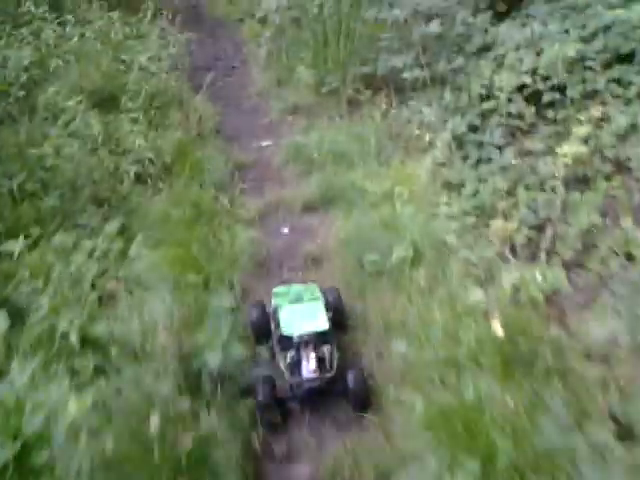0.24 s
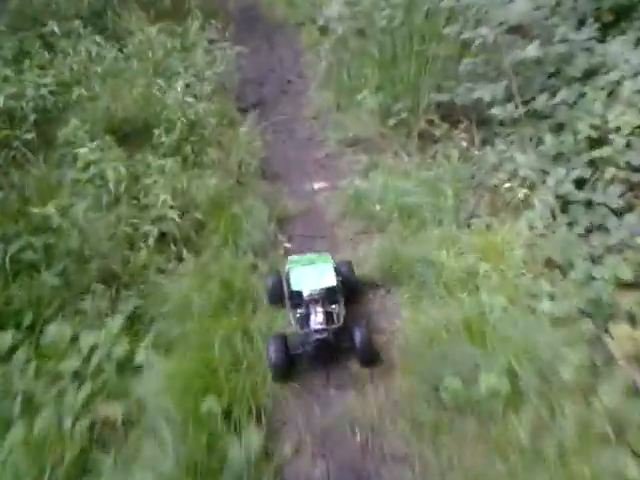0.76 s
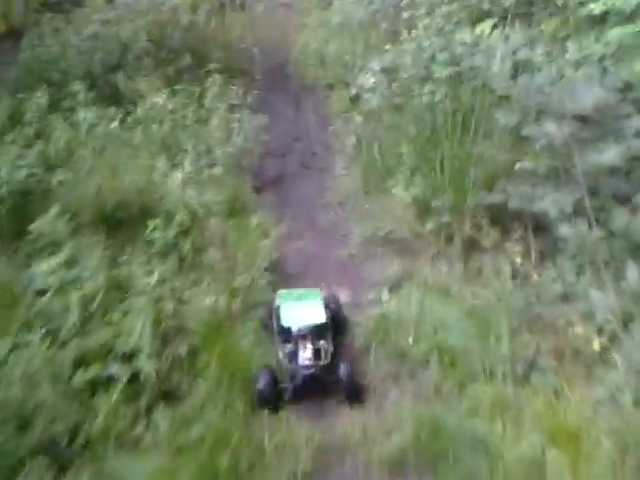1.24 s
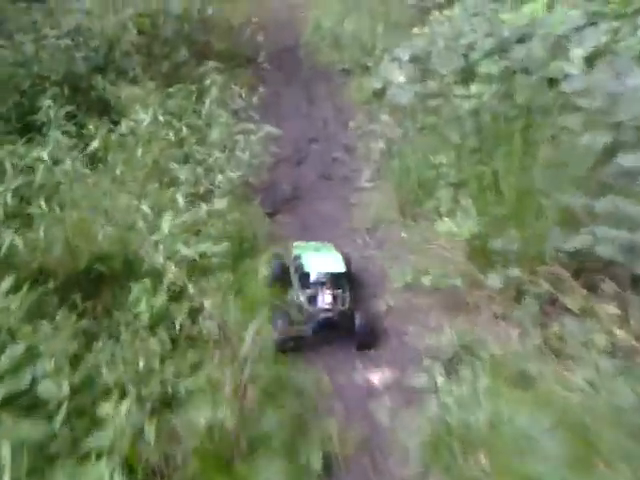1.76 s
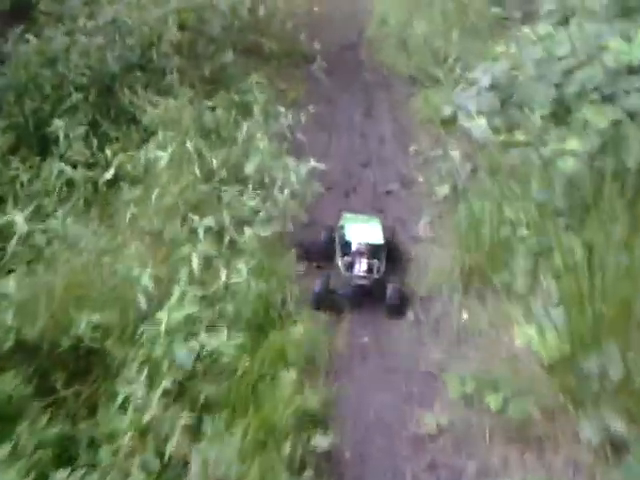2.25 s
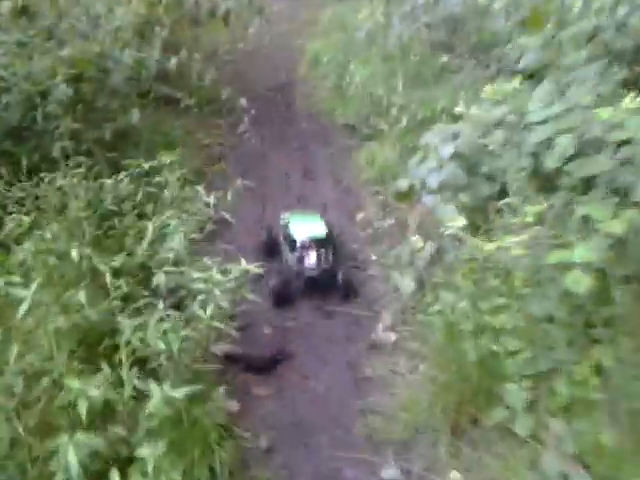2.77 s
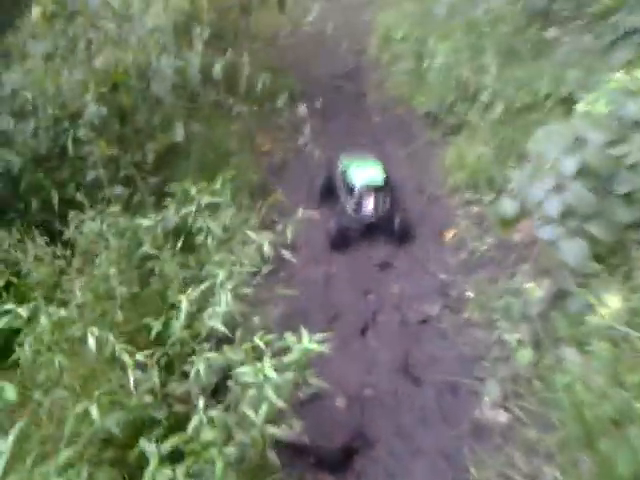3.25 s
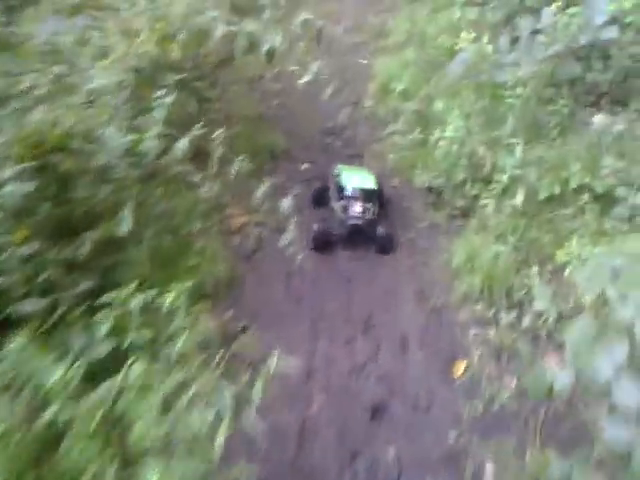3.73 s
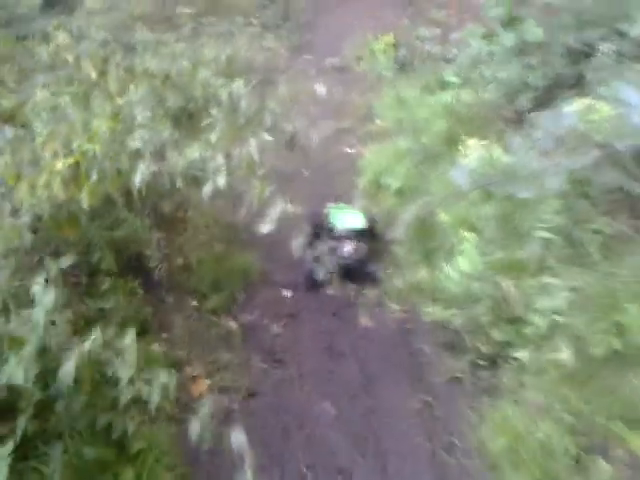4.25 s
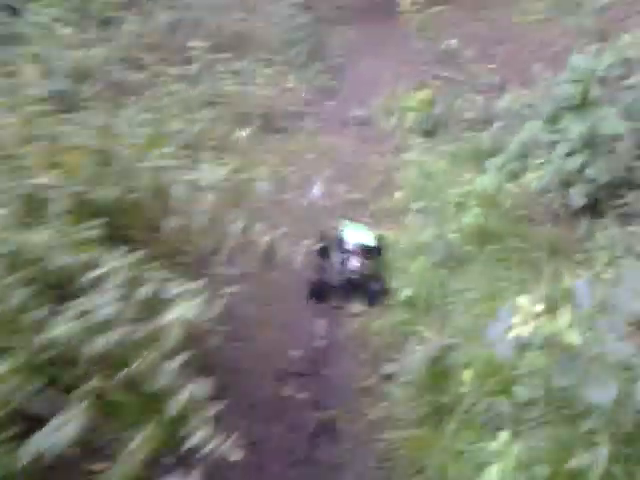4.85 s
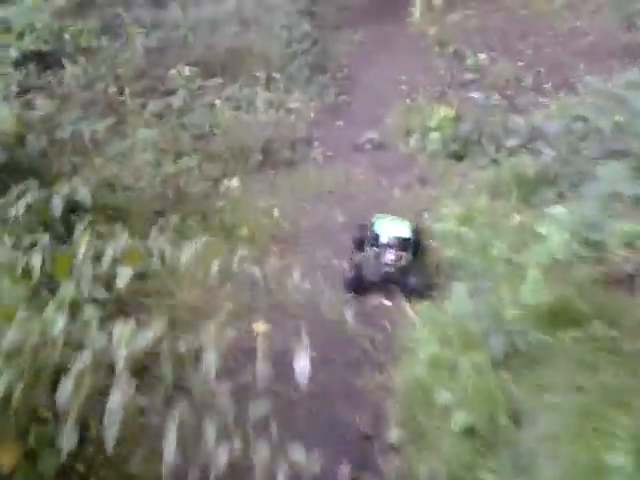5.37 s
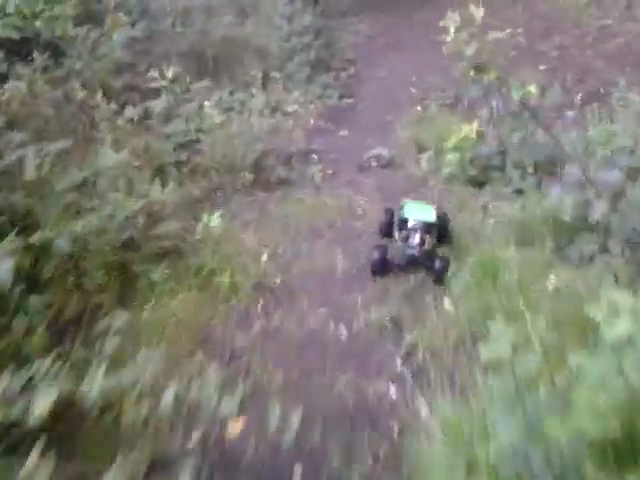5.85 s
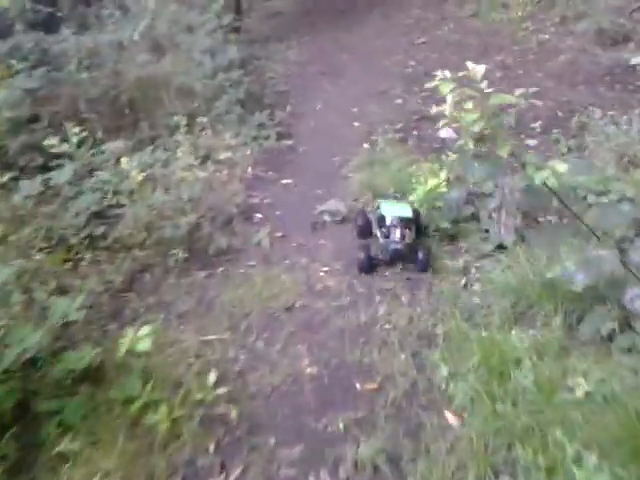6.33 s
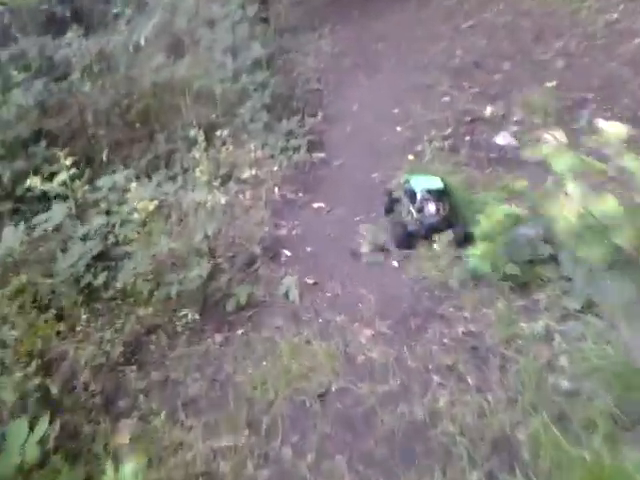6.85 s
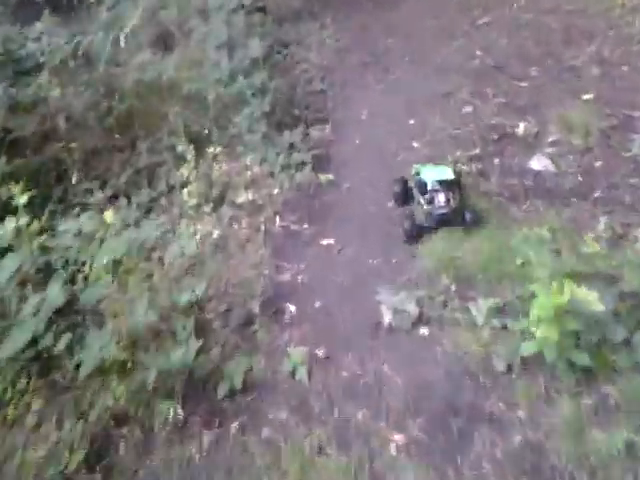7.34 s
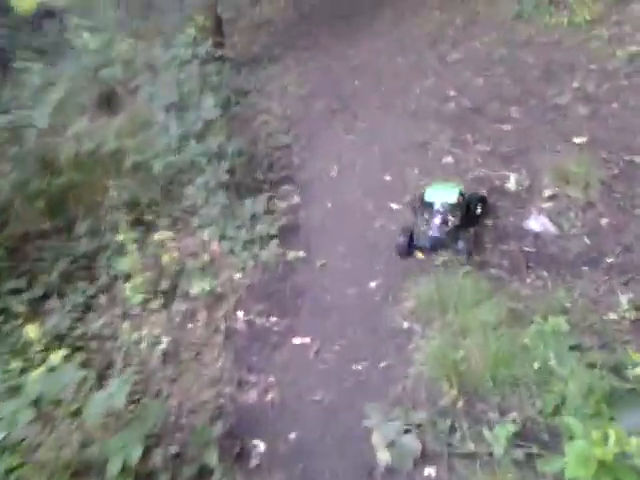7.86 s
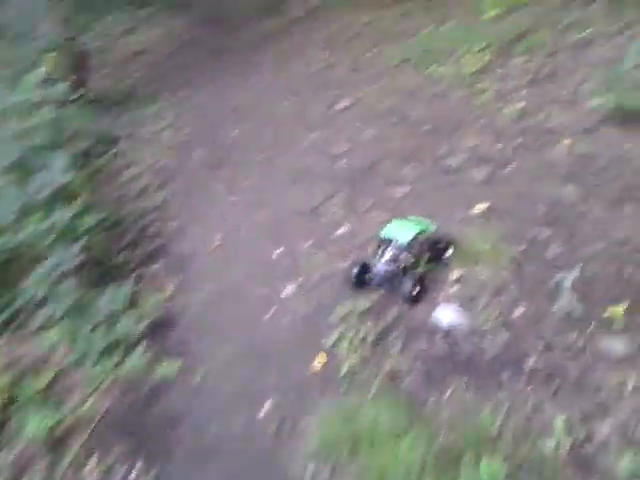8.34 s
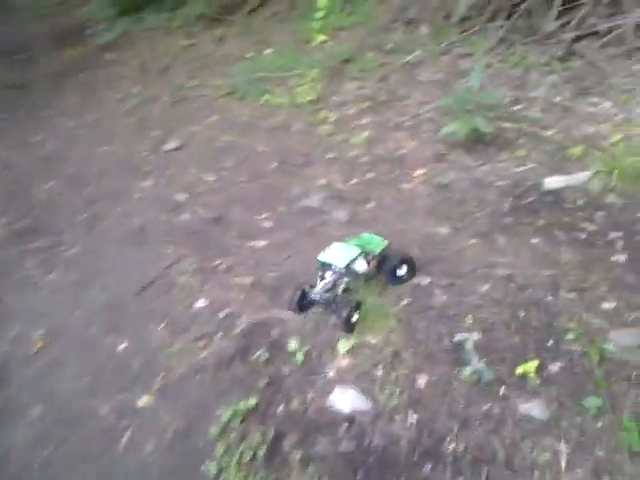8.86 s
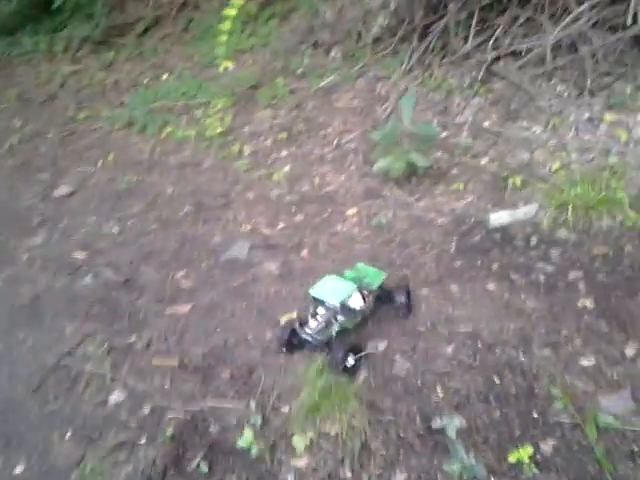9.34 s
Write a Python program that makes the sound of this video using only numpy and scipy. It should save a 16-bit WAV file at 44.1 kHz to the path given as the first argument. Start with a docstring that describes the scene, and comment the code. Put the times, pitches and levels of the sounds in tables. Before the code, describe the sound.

Irregular hollow clacks, thumps and scuffs on a carried camera, over a warbling little gear whine, fizzing motor and rustling grass outdoors.

```python
"""An overgrown woodland trail: a walker follows a small electric crawler truck, camera in hand.
The steps swing something loose against the camera: damped tones make its case ring and thump, noise its scrapes.
Ahead, the truck's gears warble once per turn as their tone sweeps through resonances, clatter, chirp and squeal.
Its motor fizzes, the steering servo buzzes in ticks, and grass rustles under the tyres.
Shaped noise also makes the distant wash of the woods, short treble swishes and the rub of the hand."""
import sys
import numpy as np
from scipy import signal
from scipy.fft import rfft, irfft, next_fast_len
from scipy.io import wavfile
from scipy.ndimage import map_coordinates

SR = 44100
rng = np.random.default_rng(int(sys.argv[2]) if len(sys.argv) > 2 else 0)


def generate_wav(sig):
    """Save sig (samples, or channels by samples) to the path in sys.argv[1] as 16-bit PCM at SR."""
    pcm = np.round(np.clip(np.atleast_2d(sig).T, -1, 1) * 32767).astype(np.int16)
    wavfile.write(sys.argv[1], SR, pcm)


N = 423360  # length of the scene in samples


def amp(db):
    """Turn decibels into a gain."""
    return 10 ** (np.asarray(db) / 20)


def unit(x):
    """Scale a sound to an rms level of 1."""
    return x / np.sqrt(np.mean(x ** 2) + 1e-20)


def along(points, hz):
    """Read a curve of (f/Hz, value) points at the given frequencies, on a log axis."""
    f, v = np.transpose(points)
    return np.interp(np.log(hz + 1), np.log(f + 1), v)


def curves(rows):
    """Join the rows of a timed table by straight lines, one curve per column after the time."""
    s, *cols = np.transpose(rows)
    return [np.interp(np.arange(N) / SR, s, c) for c in cols]


def wobble(rate):
    """Draw a smooth random curve through so many random points a second."""
    points = rng.standard_normal(int(N * rate / SR) + 4)
    return map_coordinates(points, [np.arange(N) * rate / SR])


def swell(s, length):
    """Make a bell-shaped gain around time s, down to 1/e half a length away on either side."""
    away = 2 * (np.arange(N) / SR - s) / length
    return np.exp(-np.minimum(away ** 2, 50))


def filtered(x, response):
    """Multiply the spectrum of x by a gain that depends on frequency."""
    m = next_fast_len(N + SR // 2)
    return irfft(rfft(x, m) * response(np.fft.rfftfreq(m, 1 / SR)), m)[:N]


def coloured(x, spectrum):
    """Shape x with a spectrum table, at rms 1."""
    return unit(filtered(x, lambda hz: amp(along(spectrum, hz))))


def noise(spectrum):
    """Make noise of rms 1 shaped by a spectrum table."""
    return coloured(rng.standard_normal(N), spectrum)


def add(track, s, sound):
    """Mix a sound into the track at time s."""
    start = max(round(s * SR), 0)
    track[start:start + len(sound)] += sound[:max(len(track) - start, 0)]


RELEASE_S = 0.004  # how quickly a blow lets go of the case


def ring(modes, t, detune, flat=0):
    """Sum damped tones; each contact varies their level, pitch and decay, and holds them flat until it lets go."""
    hz, db, t60 = np.transpose(modes)[:, :, None]
    strength, shift = rng.standard_normal((2, len(modes), 1))
    damping = np.exp(.18 * rng.standard_normal())
    lag_s = flat * RELEASE_S * (1 - np.exp(-t / RELEASE_S))
    level = amp(db + strength - 60 * damping * t / t60)
    tones = np.sin(2 * np.pi * hz * (1 + detune * shift) * (t - lag_s))
    return np.sum(level * tones, axis=0)


# speed of the motor, as the mean rate at which gear teeth meet: (t/s, f/Hz)
MOTOR_SPEED = [(0, 2020), (.3, 2349), (.65, 2280), (.9, 2078), (1.45, 2253), (1.7, 1995), (2.0, 2068),
               (2.2, 2334), (2.55, 2380), (2.7, 1989), (3.3, 1992), (3.8, 1938), (4.3, 2022), (5.1, 1967),
               (5.3, 1792), (5.5, 2020), (5.8, 1871), (6.2, 2095), (6.75, 2085), (7.0, 1310), (7.25, 1240),
               (7.55, 1584), (7.9, 1592), (8.4, 1444), (8.7, 1497), (9.1, 1126), (9.6, 1066)]
TEETH = 98  # teeth that meet in one turn of the spur gear
CRUISE_HZ = 2100  # rate of meeting teeth at walking pace
BINDING_SHARE = .75  # share of each turn in which the gear slows
LOAD_DB = 7  # swing of the pressure on the teeth, up and down, within a turn
SWING_HZ = 340  # roughly how far the tone sinks in each turn


def drive():
    """The spur gear binds, slows and springs free once per turn: mean and momentary mesh Hz, and load on the teeth."""
    mesh_hz, = curves(MOTOR_SPEED)
    turn = (np.cumsum(mesh_hz / TEETH) / SR + .08 + .03 * wobble(12)) % 1
    slowing = np.maximum(1 - turn / BINDING_SHARE, 0) ** 1.7
    springing_free = np.maximum(turn - BINDING_SHARE, 0) / (1 - BINDING_SHARE)
    swing = slowing + springing_free
    sag_hz = SWING_HZ * amp(2.2 * wobble(17)) * (swing - swing.mean())
    # the faster the truck, the more the ground jolts the motor
    ground_jolts = (.013 * wobble(20) + .014 * wobble(85)) * (mesh_hz / CRUISE_HZ) ** 2
    jolts = ground_jolts + .008 * wobble(500)
    # the teeth press hardest as the gear slows
    load = amp(LOAD_DB * np.cos(2 * np.pi * (turn - .21)) + 3 * wobble(35))
    return mesh_hz, mesh_hz * (1 + jolts) + sag_hz, load


# the gears under load: (t/s, relative whine level/dB, relative level of the octave overtone/dB)
GEAR_WHINE = [(0, -43, -7), (.25, -38.5, -6), (2.6, -39, -6), (3.7, -41, -1), (4.9, -38.5, -7),
              (5.8, -38.5, -9), (6.5, -43, -14), (7.25, -39, -3), (7.7, -44, -7), (9.1, -38, -15),
              (9.6, -46, -12)]
# resonances of the gearbox: (f/Hz, width/Hz, level/dB)
GEARBOX_RESONANCES = [(1270, 300, -7), (1975, 190, 0), (2410, 190, -1.5), (2760, 110, -10), (2990, 190, -5),
                      (3400, 170, -13), (3950, 120, -10), (4340, 220, -6.5), (4720, 240, -3),
                      (5150, 400, -10), (5630, 150, -6)]
CLATTER_DB = -4  # loose teeth rattling the gearbox, under the whine at walking pace


def gears(mesh_hz, hz, load):
    """The mesh tone and its octave sweep through the gearbox resonances once per turn, over a noisy clatter."""
    whine_db, overtone_db = curves(GEAR_WHINE)
    phase = 2 * np.pi * np.cumsum(hz) / SR

    def box(f):
        """Each resonance lifts the frequencies near its centre, over a faint even floor."""
        peaks = (amp(db) / (1 + (2 * (f - centre) / width) ** 2) for centre, width, db in GEARBOX_RESONANCES)
        return amp(-32) + sum(peaks)

    # the octave sounds only on the very peaks of the upper resonances
    octave_peaks = 2 * box(2 * hz) ** 2 / (1 + (2700 / (2 * hz)) ** 40)
    octave_tone = np.sin(2 * phase + .6 * wobble(600))
    overtone = amp(overtone_db + 4 * wobble(40)) * octave_peaks * octave_tone
    tones = unit(load * (box(hz) * np.sin(phase) + overtone))
    # the clatter is brighter than the tones and grows quickly with speed
    rattle = np.sqrt(load) * rng.standard_normal(N)
    clatter = unit(filtered(rattle, lambda f: f * box(f)))
    octaves_above_cruise = np.log2(mesh_hz / CRUISE_HZ)
    clatter_gain = amp(CLATTER_DB + 15 * octaves_above_cruise)
    return amp(whine_db - 1.7) * (tones + clatter_gain * clatter)


# presses of the throttle: (start t/s, end t/s, relative level of the brush fizz/dB)
THROTTLE_PRESSES = [(-0.1, 0.822, -46), (1.1, 1.58, -39.5), (1.7, 2.098, -59), (2.196, 2.66, -43),
                    (2.911, 3.382, -42.5), (3.686, 4.404, -50), (4.466, 5.252, -39.5), (5.51, 5.905, -38.5),
                    (5.996, 6.206, -34), (6.273, 6.786, -37.5), (7.476, 8.07, -37.5), (8.29, 8.7, -36.5),
                    (9.291, 9.699, -37)]
# spectrum of the fizz: (f/Hz, relative level/dB)
FIZZ_SPECTRUM = [(2500, -53), (4000, -30), (4600, 0), (5000, 2), (5600, 1), (6100, -13.5), (6900, -16.5),
                 (7500, -20.5), (9000, -75)]
THROTTLE_ATTACK_S, THROTTLE_RELEASE_S = 0.06, 0.11
BRUSH_HZ = 5200  # middle pitch of the singing brushes


def brushes(mesh_hz, hz, load):
    """The motor's brushes fizz and sing as the throttle opens, bending with each turn, and fade as it closes."""
    now, level = np.arange(N) / SR, np.zeros(N)
    for start, end, db in THROTTLE_PRESSES:
        opening = np.clip((now - start) / THROTTLE_ATTACK_S, 0, 1)
        closing = np.exp(-np.maximum(now - end, 0) / THROTTLE_RELEASE_S)
        level = np.maximum(level, amp(db) * opening * closing)
    sing_hz = BRUSH_HZ * hz / mesh_hz * (1 + .022 * wobble(1200))
    sing_tone = np.sin(2 * np.pi * np.cumsum(sing_hz) / SR)
    sing = unit(load * amp(along(FIZZ_SPECTRUM, sing_hz)) * sing_tone)
    fizz = unit(noise(FIZZ_SPECTRUM) + .4 * sing)
    return level * amp(-4.5) * fizz


# the ground under the tyres, from long grass to bare earth: (t/s, relative rustle level/dB)
GROUND_COVER = [(0, -44), (.3, -42.5), (1.9, -45), (2.5, -43), (2.8, -45.5), (6.1, -46.5), (7.35, -50),
                (8.55, -47), (9.15, -53), (9.6, -54)]
# spectrum of the rustle: (f/Hz, relative level/dB)
RUSTLE_SPECTRUM = [(300, -28.5), (700, 2), (900, 7), (1300, -5.5), (1650, 3), (2300, 2.5), (2900, -1),
                   (3400, 0), (3800, -4), (4500, -3), (5700, -0.5), (6700, -11.5), (7500, -30.5),
                   (9000, -45.5)]


def tyres():
    """Grass and grit under the tyres make a dense rustle of noise with small snaps in it."""
    rustle_db, = curves(GROUND_COVER)
    # about 250 snaps a second
    snaps = rng.standard_normal(N) * (rng.random(N) < 250 / SR)
    rustle = unit(noise(RUSTLE_SPECTRUM) + amp(-12.0) * coloured(snaps, RUSTLE_SPECTRUM))
    tufts_db = .8 * wobble(22) + .6 * wobble(6)
    return amp(rustle_db + 7.0 + tufts_db) * rustle


# spectrum of the woodland: (f/Hz, relative level/dB)
WOODS_SPECTRUM = [(30, 3), (150, -4), (250, -1.5), (550, -1.5), (800, 2), (1200, 5), (1600, -3),
                  (2300, -9.5), (3000, -12.5), (3800, -40), (5500, -12), (7000, -38.5), (8500, -53.5)]


def woods():
    """The distant wash of the woodland is nearly steady noise."""
    return amp(-42.5 + 0.35 * wobble(1.6)) * noise(WOODS_SPECTRUM)


# the walker's strides, each a jolt of the camera: (middle t/s, length/s, relative rumble level/dB)
STRIDE_JOLTS = [(0.0, 0.1, -24.5), (0.723, 0.22, -34), (1.216, 0.23, -25), (1.767, 0.71, -39),
                (2.325, 0.35, -23.5), (2.88, 0.32, -28), (3.492, 0.28, -23.5), (4.102, 0.42, -39),
                (4.77, 0.35, -24.5), (5.262, 0.2, -24), (5.77, 0.87, -35), (6.073, 0.28, -43),
                (6.587, .22, -33.5), (6.96, 0.23, -38), (7.64, 0.46, -28), (8.196, 0.23, -41),
                (8.891, 0.11, -33), (9.494, 0.21, -22)]
# spectrum of the hand's rumble: (f/Hz, relative level/dB)
RUMBLE_SPECTRUM = [(8, -11), (22, 9), (42, -4.5), (70, -9.5), (120, -20), (200, -33.5), (400, -38),
                   (1000, -68)]
# spectrum of rubbing on the case, also in scrapes and knocks: (f/Hz, relative level/dB)
SCUFF_SPECTRUM = [(40, -1.5), (100, 7), (145, 5.5), (200, -10.5), (290, 0), (380, 2.5), (600, -7), (850, 2),
                  (1050, -14.5), (1480, -15.5), (1700, -33.5), (2500, -17), (4000, -45.5), (9000, -87)]
GRIP_DB = -37  # relative rumble of the hand between strides


def handling():
    """The fluttering rumble of the grip swells with every stride, and the hand rubs on the case."""
    flutter = amp(2.5 * wobble(22))
    jolts = sum(amp(db) * swell(s, length) for s, length, db in STRIDE_JOLTS)
    grip = flutter * (amp(GRIP_DB) + jolts)
    return amp(-1) * grip * noise(RUMBLE_SPECTRUM) + amp(-22.5) * grip * noise(SCUFF_SPECTRUM)


# drags across the case: (middle t/s, length/s, relative level/dB)
CASE_DRAGS = [(0.025, 0.032, -33), (0.637, 0.022, -31), (0.772, 0.017, -29), (1.243, 0.041, -31),
              (2.406, 0.087, -28), (3.411, 0.034, -27), (3.5, 0.088, -36), (3.644, 0.089, -40),
              (4.637, 0.034, -24.5), (4.707, 0.023, -28), (5.191, 0.021, -22.5), (5.256, 0.05, -29),
              (5.351, 0.047, -28.5), (5.748, 0.015, -27), (6.554, 0.023, -21.5), (7.628, 0.025, -23),
              (8.834, 0.022, -22.5), (8.97, 0.034, -25), (9.463, 0.027, -19.5)]
# ringing tones of the case, also in knocks: (f/Hz, level/dB, time to fall 60 dB/s)
CASE_MODES = [(405.7, -20, 0.078), (769, -19.5, 0.061), (857, -10, 0.055), (907.6, 1.5, 0.043),
              (1432, -1.5, 0.011), (1512, -14, 0.03), (2068, -14, 0.031), (2187, -13, 0.015),
              (5760, -19, 0.054)]
SLIPS_PER_S = 450


def scrapes():
    """The loose thing drags over the case: uneven slips that barely ring it, in a crunchy rub."""
    t = np.arange(SR // 20) / SR
    slips = rng.standard_normal(N) * (rng.random(N) < SLIPS_PER_S / SR)
    muted = ring(CASE_MODES, t, detune=.01) * amp(-60 * t / 0.028)
    ringing = unit(signal.fftconvolve(slips, muted)[:N])
    crunch = unit(amp(4 * wobble(280)) * noise(SCUFF_SPECTRUM))
    drag = sum(amp(db) * swell(s, length) for s, length, db in CASE_DRAGS)
    return drag * (amp(-12.0) * ringing + crunch)


# blows on the camera case: (t/s, relative ring level/dB, thump level/dB)
CASE_BLOWS = [(0.337, -16.5, -25), (0.605, -11, -23), (0.632, -24, -22), (0.691, -21, -12),
              (0.709, -23, -25), (0.736, -18.5, -38), (0.757, -15, -36), (0.777, -32, -29),
              (0.989, -11, -14), (1.138, -15.5, -12.5), (1.15, -28, -19), (1.209, -12, -15),
              (1.231, -28, -14), (1.296, -22.5, -18), (1.516, -9, -13), (1.734, -5.5, -30),
              (1.807, -17, -49), (2.036, -13.5, -17), (2.121, -11.5, -53), (2.154, -14, -45),
              (2.284, -12.5, -12.5), (2.36, -21, -17), (2.396, 0.5, -12), (2.656, -19.5, -23.5),
              (2.761, -15, -33), (2.777, -3, -8), (2.848, -14.5, -33), (2.861, -4.5, -15),
              (2.948, -20.5, -27), (3.159, -17.5, -20.5), (3.33, -14, -24), (3.342, -22, -30),
              (3.36, -15, -36), (3.397, -30, -21), (3.415, -27, -17), (3.467, -24.5, -14),
              (3.49, -15.5, -11), (3.523, -17.5, -26), (3.564, -25, -23), (3.593, -4, -12),
              (3.605, -9.5, -18), (3.676, -21.5, -25), (3.907, -23, -37), (4.096, -14.5, -12.5),
              (4.18, -12.5, -12.5), (4.452, -17, -23), (4.556, -5.5, -12), (4.622, -26, -24),
              (4.636, -9.5, -14), (4.685, -22.5, -18), (4.707, -22, -15), (4.781, -15, -14),
              (4.789, -12.5, -11), (5.106, -4, -10.5), (5.162, -7, -21), (5.179, -21, -17),
              (5.192, -20, -12), (5.227, -34, -7), (5.274, -22, -18), (5.345, -18, -11.5), (5.378, -5, -15),
              (5.51, -29, -18.5), (5.654, -5.5, -16), (5.73, -11.5, -17), (6.0, 6, -33), (6.01, 2, -15),
              (6.02, -4, -22), (6.083, -19, -10.5), (6.316, -9.5, -29), (6.459, -19, -28),
              (6.552, -25, -20), (6.608, -20, -16), (6.852, -14.5, -14.5), (6.933, -24, -22),
              (6.979, -19, -46), (7.285, -26, -37), (7.51, -19, -26), (7.559, -3, -18.5), (7.572, -16, -24),
              (7.62, -18.5, -15), (7.717, -15, -14), (7.787, -21, -32), (8.095, -4, -23),
              (8.153, -20.5, -19), (8.249, -12.5, -21), (8.313, -5.5, -18.5), (8.821, -6, -14),
              (8.89, -15, -23), (8.97, -15.5, -17.5), (9.366, -2, -8), (9.376, -7, -15),
              (9.383, -12.5, -15), (9.445, -5, -8), (9.519, -18, -17), (9.591, -3, -25)]
# slow swings of the microphone under a blow: (f/Hz, level/dB, time to fall 60 dB/s)
MICROPHONE_SWINGS = [(44, 0.5, 0.086), (69.7, 4.5, 0.072), (123, -11.5, 0.11)]
# spectrum of the crack, also of the treble swishes: (f/Hz, relative level/dB)
SWISH_SPECTRUM = [(2000, -20), (4000, -12.5), (5400, 1.5), (6200, -6.5), (7500, -27), (9000, -54.5)]
CONTACT_HZ = 2950  # above this a blow rings the case less and less
# harder and heavier blows rub more (dB, dB per dB, dB per dB)
SCUFF_DB, SCUFF_PER_RING, SCUFF_PER_THUMP = -5.5, 0.61, 0.26
# the crack stands out only in hard blows (dB, dB per dB, s to fall 60 dB)
CRACK_DB, CRACK_PER_RING, CRACK_T60_S = -20.5, 1.8, 0.0095


def knocks():
    """Each blow cracks and rings the case, rebounds lightly, scuffs along it and shoves the microphone."""
    out, rubbing, cracking = np.zeros((3, N))
    t = np.arange(SR // 5) / SR
    rise = lambda seconds: 1 - np.exp(-t / seconds)
    scuff, crack = noise(SCUFF_SPECTRUM), noise(SWISH_SPECTRUM)
    modes = [(hz, db - 10 * np.log10(1 + (hz / CONTACT_HZ) ** 4), t60) for hz, db, t60 in CASE_MODES]
    for s, ring_db, thump_db in CASE_BLOWS:
        # a light blow stays longer in contact, so its ring starts more softly
        contact_s = .0012 * amp(-.35 * ring_db)
        add(out, s, amp(ring_db + 1.0) * rise(contact_s) * ring(modes, t, detune=0.015, flat=0.094))
        rebound_s = .008 + .008 * rng.random()
        add(out, s + rebound_s, amp(ring_db - 19) * rise(.0025) * ring(modes, t, detune=.008))
        add(out, s, -amp(thump_db) * rise(0.0054) * ring(MICROPHONE_SWINGS, t, detune=0.12))
        scuff_db = SCUFF_DB + SCUFF_PER_RING * ring_db + SCUFF_PER_THUMP * thump_db
        add(rubbing, s - .003, amp(scuff_db - 60 * t / 0.06) * rise(0.0023))
        add(cracking, s, amp(CRACK_DB + CRACK_PER_RING * ring_db - 60 * t / CRACK_T60_S))
    return out + rubbing * scuff + cracking * crack


# steering moves: (start t/s, end t/s, buzz f/Hz, relative level/dB, roughness 0-1)
STEERING_MOVES = [(2.115, 2.35, 229.8, -39, 0.43), (8.088, 8.312, 265, -39.5, 0.43),
                  (8.56, 8.82, 244.4, -39.5, 0.4), (9.382, 9.62, 219, -51, 0.57)]
# spectrum of the servo: (f/Hz, relative level/dB)
SERVO_SPECTRUM = [(450, -59), (620, 7), (750, 1.5), (950, -19.5), (1200, 4), (1500, -4), (2100, -5.5),
                  (2900, -13), (4200, -42), (7000, -47.5)]


def servo():
    """The steering servo runs at a wavering speed in short bursts of gear ticks, some cleaner and some grittier."""
    now, out = np.arange(N) / SR, np.zeros(N)
    waver = .026 * wobble(35)
    jitter = .06 * wobble(300)
    grit = noise(SERVO_SPECTRUM)
    for start, end, hz, db, rough in STEERING_MOVES:
        # one tick each time the count of cycles passes a whole number
        cycles = np.cumsum(hz * (1 + waver + rough * jitter)) / SR
        ticks = np.diff(np.floor(cycles), prepend=0)
        running = np.clip(np.minimum(now - start, end - now) / 0.043, 0, 1)
        buzz = coloured(ticks, SERVO_SPECTRUM) + rough * grit
        out += amp(db + 3.5 + 2 * wobble(35)) * running * buzz
    return out


# short treble swishes, some of them cracks of the knocks: (middle t/s, length/s, level/dB)
TREBLE_SWISHES = [(2.383, 0.051, -45), (2.554, 0.04, -38), (3.35, 0.025, -35), (5.083, 0.028, -29.5),
                  (5.162, 0.032, -33.5), (8.099, 0.018, -34), (9.371, 0.031, -34)]


def treble_swishes():
    """Short swishes of treble noise, crackly because their level jumps quickly; some are cracks of the knocks."""
    crackle = unit(amp(3.5 * wobble(600)) * noise(SWISH_SPECTRUM))
    return crackle * sum(amp(db) * swell(s, length) for s, length, db in TREBLE_SWISHES)


# a thin squeal, probably from the gearbox: (t/s, level/dB)
GEARBOX_SQUEAL = [(0, -75), (4.74, -74), (4.82, -50.5), (5.2, -48), (5.4, -59), (5.9, -51), (6.4, -50),
                  (6.8, -85.5)]


def gearbox_squeal():
    """A thin, quivering squeal, probably from the gearbox: one tone whose pitch and level waver quickly."""
    squeal_db, = curves(GEARBOX_SQUEAL)
    hz = 2790 * (1 + .025 * wobble(300))
    tone = unit(np.sin(2 * np.pi * np.cumsum(hz) / SR))
    return amp(squeal_db + 3.5 * wobble(30)) * tone


# single chirps of the gears: (middle t/s, level/dB)
GEAR_CHIRPS = [(6.936, -29), (6.975, -38), (7.51, -35), (7.645, -37), (7.695, -39), (7.761, -36),
               (7.828, -33), (8.007, -31), (8.274, -35), (8.397, -30), (8.536, -29.5), (8.677, -30)]
CHIRP_HZ, CHIRP_S = 1930, .011  # pitch near the top of the arch; time from its middle to 1/e


def gear_chirps():
    """Single gear chirps: the turning gear's tone arches up, tops out near a gearbox resonance and falls."""
    out, t = np.zeros(N), np.arange(SR // 12) / SR
    away = (t - t.mean()) / CHIRP_S
    for s, db in GEAR_CHIRPS:
        offset = .012 * rng.standard_normal()
        tilt = .025 * rng.standard_normal() * away
        hz = CHIRP_HZ * (1 + offset + tilt - .035 * away ** 2)
        tone = np.sin(2 * np.pi * np.cumsum(hz) / SR)
        add(out, s - t.mean(), amp(db) * np.exp(-away ** 2) * tone)
    return out


def scene():
    """The truck ahead, the woods around and the camera in the hand."""
    motion = drive()
    truck = gears(*motion) + brushes(*motion) + tyres() + servo() + gearbox_squeal() + gear_chirps()
    camera = handling() + scrapes() + knocks()
    return (truck + woods() + treble_swishes() + camera)[None]


TREBLE_HZ, TOP_HZ = 7500, 15900  # where the treble drops away, and where all sound ends


def record(dry):
    """A small camera: its treble ends early, and sounds too loud for it are clipped."""
    band = lambda hz: 1 / np.sqrt(1 + (hz / TREBLE_HZ) ** 30)
    ceiling = .72
    clipped = np.clip(filtered(dry[0], band), -ceiling, ceiling)
    # the treble that clipping adds is halved
    return filtered(clipped, lambda hz: (1 + band(hz)) / 2 * (hz < TOP_HZ))[None]


dry = scene()
out = record(dry)
generate_wav(out)
```